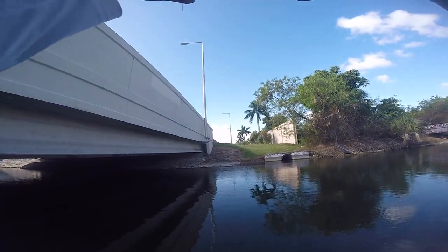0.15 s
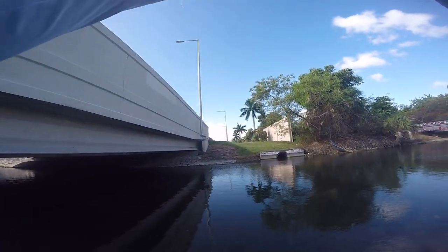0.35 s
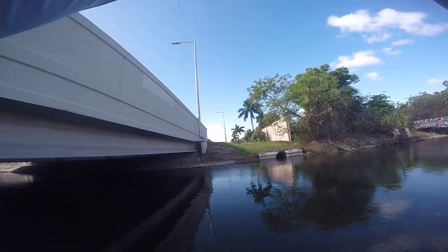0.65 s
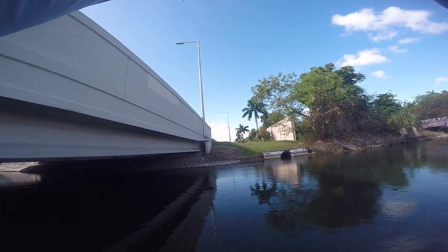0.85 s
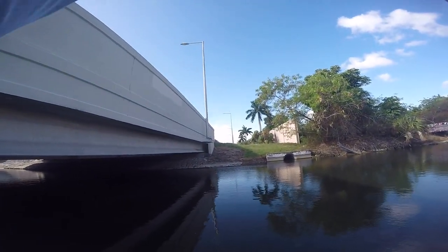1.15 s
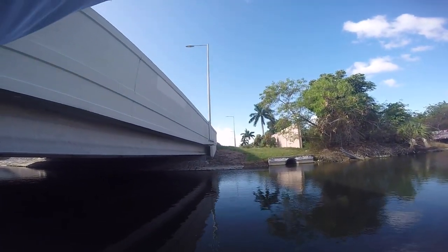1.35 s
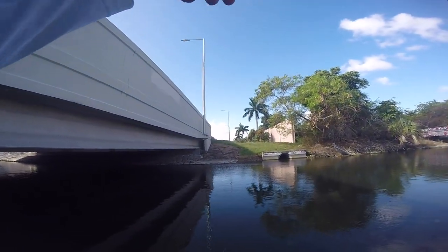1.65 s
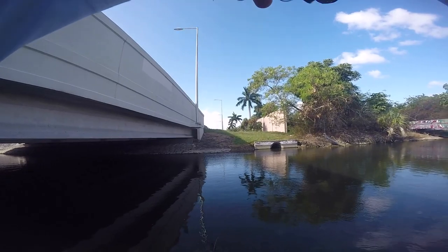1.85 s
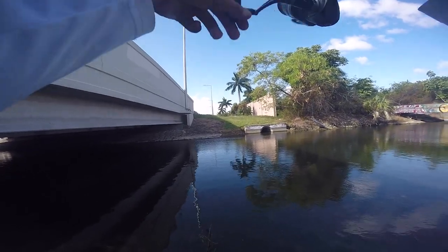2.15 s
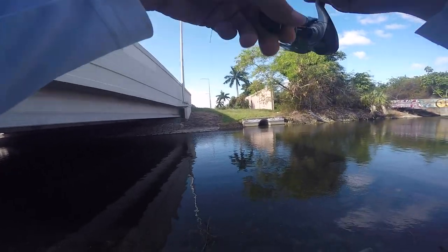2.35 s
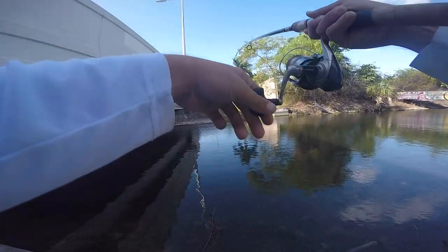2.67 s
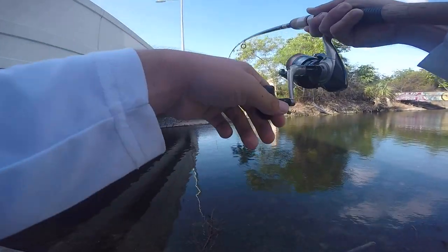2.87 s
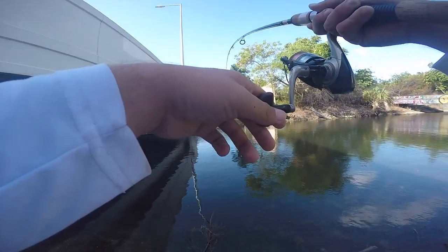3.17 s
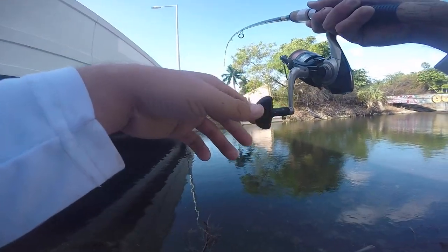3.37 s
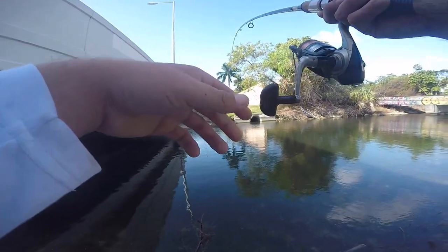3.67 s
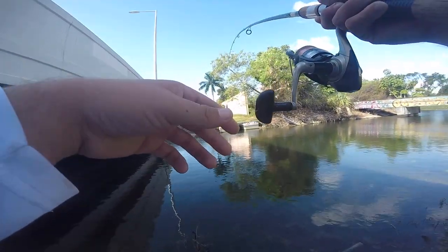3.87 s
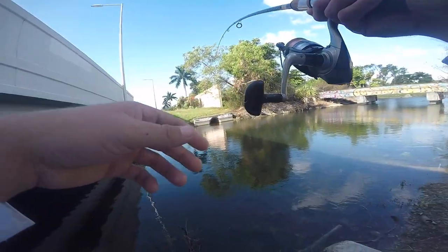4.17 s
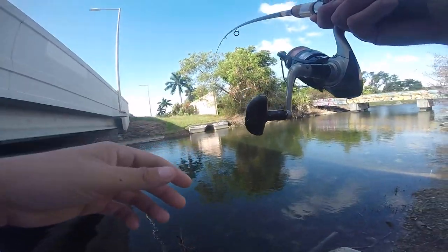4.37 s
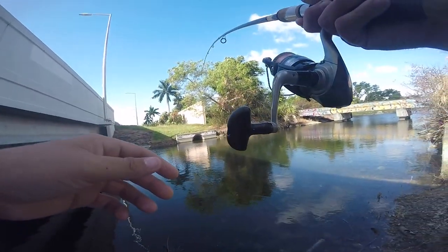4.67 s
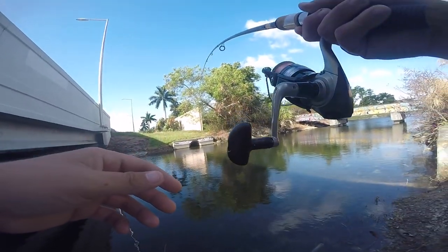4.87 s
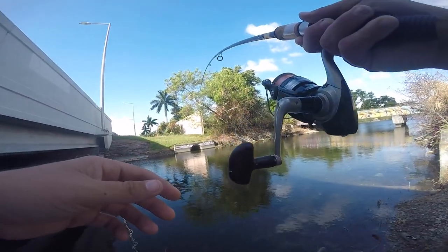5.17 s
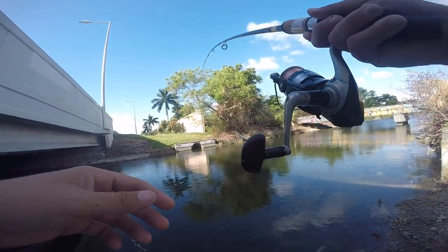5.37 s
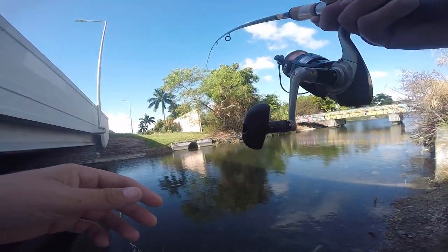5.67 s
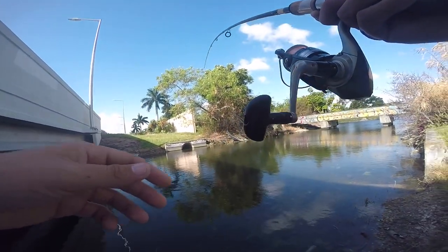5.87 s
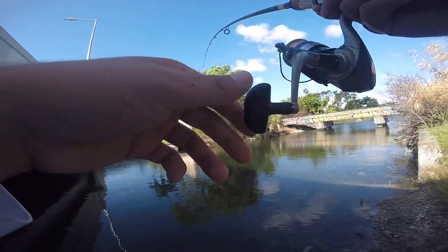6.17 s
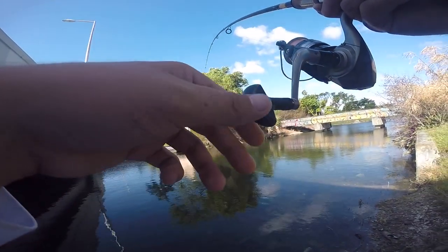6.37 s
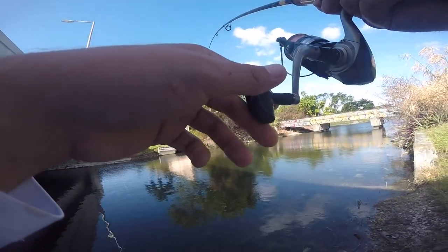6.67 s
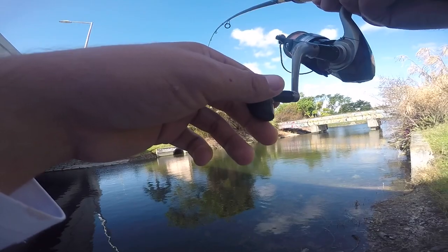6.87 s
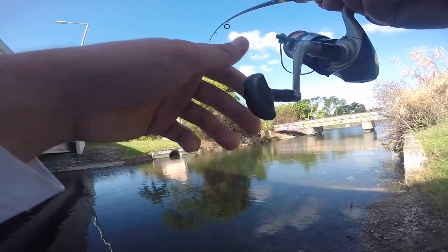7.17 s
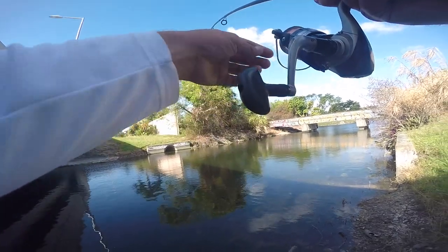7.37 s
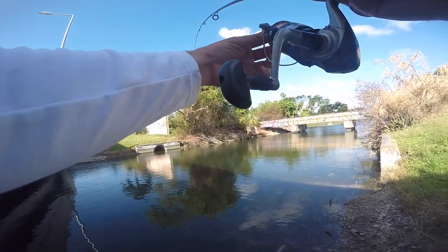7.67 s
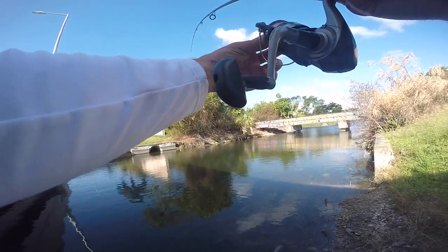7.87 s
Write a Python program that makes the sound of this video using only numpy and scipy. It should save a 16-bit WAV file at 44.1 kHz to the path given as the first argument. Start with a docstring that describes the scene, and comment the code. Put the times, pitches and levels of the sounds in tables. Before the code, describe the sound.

Steady traffic roar from a bridge, with early wind buffets on the microphone and a few sharp fishing reel clicks.

```python
"""Traffic roars on a road bridge, heard by a small camera on the chest of an angler on the canal bank. Many
tyres and engines sum to broadband noise, with lingering bands of high hiss; the deck booms at two low
resonances, under engine notes and a tyre drone. Wind buffets and pops on the microphone port, then eases to a
low rumble with slight swells. Close by, the reel clicks, cloth and line tick, and soft swishes come and go."""
import sys
import numpy as np
from scipy import signal
from scipy.fft import rfft, irfft, next_fast_len
from scipy.io import wavfile
from scipy.ndimage import uniform_filter1d

SR = 44100
rng = np.random.default_rng(int(sys.argv[2]) if len(sys.argv) > 2 else 0)


def waveform_to_disk(signal):
    """Save audio, clipped to [-1, 1], as 16-bit WAV at the path in sys.argv[1]."""
    frames = np.transpose(np.atleast_2d(signal))
    scaled = np.clip(frames, -1, 1) * 32767
    samples = np.round(scaled).astype(np.int16)
    wavfile.write(sys.argv[1], SR, samples)


N = 354123
T = np.arange(N) / SR

# Sleeves and fingers moving on the rod. Each row: start in seconds, length in seconds, peak level in dB.
HAND_MOVES = [(1.5, 1.27, -56), (3.9, 1.7, -59), (7.4, .8, -73)]
# Bands in which cloth and line tick. Each row: centre in Hz, width in Hz, relative level in dB.
CLOTH_BANDS = [(1920, 1200, 0), (3000, 2700, 2), (4460, 1500, 0.5), (6700, 1100, -5), (13500, 3000, -18)]
# Soft swishes and, in the long rows at 6650-8200 Hz, lingering bands of high hiss in the roar.
# Each row: start in seconds, length in seconds, centre in Hz, width in Hz, peak level in dB.
SWISHES_AND_HISS = [(2.2, 0.16, 483, 120, -28.5), (2.3, 0.56, 1620, 320, -55),
                    (3.405, 0.36, 2260, 380, -49.5), (3.42, .2, 2700, 300, -53),
                    (3.53, .15, 2120, 250, -54), (3.55, 0.42, 2500, 950, -53), (5.5, 0.27, 4200, 2490, -54),
                    (4.5, 2.2, 10200, 550, -78), (7.5, 1.3, 2700, 220, -55.5), (4, 0.95, 367, 230, -34),
                    (-0.1, 1.7, 1700, 790, -59), (7, 1.7, 1310, 310, -52), (0.7, 3.4, 8200, 700, -70),
                    (3.8, 1.3, 6700, 700, -70), (4, 1.2, 6650, 660, -73), (4.5, 2.3, 6700, 900, -72),
                    (3.9, 2.3, 8100, 900, -74), (6.5, 2.3, 2860, 1000, -61)]
# Modes of the reel's parts. Each row: frequency in Hz, relative level in dB, seconds to decay by 60 dB
# before the hand's damping.
REEL_MODES = [(1640, 15.5, 0.025), (2050, 13, 0.02), (2840, 12.5, 0.011), (3580, 9, 0.0051),
              (4710, 11.5, 0.0076), (5230, 4, 0.0099), (5860, 6, 0.0046), (6300, 12.5, 0.0044),
              (6900, 11, 0.006), (7600, 6, .004), (8300, 6, 0.0048), (8900, 5, 0.0041), (9800, 8, 0.004),
              (11100, -2, 0.0044), (12000, 4, 0.0041), (13200, 6, 0.0054), (14300, 8, .004)]
# Reel clicks, with a crowd of small ones from 1.6 to 2.8 s. Each row: time in seconds, strength in dB, most
# favoured pitch in Hz, reach around it in octaves.
REEL_CLICKS = [(.8592, -27, 5640, 0.33), (.8593, -43, 12500, .45), (.8615, -58, 13200, .2),
               (.8634, -46, 4900, .25), (.8657, -51, 4900, .25), (1.6557, -52, 3500, .8),
               (1.847, -49, 1900, 0.78), (1.7782, -46, 2600, .6), (1.94, -49, 2200, .8),
               (1.9927, -51, 1900, .6), (2.0157, -50, 3800, .8), (2.04, -51, 4700, .5),
               (2.0623, -50, 2600, .9), (2.084, -50, 2610, 1.0), (2.126, -55, 5200, 1.1),
               (2.1695, -45, 4000, .7), (2.2114, -50, 2600, .8), (2.1908, -51, 2600, 0.97),
               (2.2581, -49, 1700, .6), (2.311, -49, 2800, .9), (2.318, -56, 6600, .8),
               (2.338, -54, 4500, .8), (2.4138, -53, 2400, .8), (2.4537, -50, 2600, .8),
               (2.3621, -54, 3000, .8), (2.3875, -55, 4400, 1.1), (2.475, -62, 14000, .5),
               (2.5192, -54, 3200, .8), (2.5826, -51, 2700, .5), (2.589, -60, 12000, 2.5),
               (2.602, -45, 3100, 0.54), (2.622, -54, 6000, .9), (2.6296, -60, 13000, 1.5),
               (2.6674, -50, 3000, .8), (2.674, -59, 13000, 1.46), (2.785, -51, 3400, 0.94),
               (3.0885, -46, 13000, 2.5), (3.0896, -37, 7700, 0.21), (3.0896, -41, 3480, 0.47),
               (3.0908, -50, 11500, .45), (3.0912, -42.5, 2000, 1.6), (3.095, -54, 4010, 1.0),
               (3.0952, -50, 6900, .2), (3.0978, -49, 3700, .6), (3.1055, -65, 11000, .8),
               (7.1615, -54, 6300, .25), (8.0263, -23.5, 4400, 0.43), (8.0263, -31, 13500, 0.33),
               (8.027, -39, 2860, .3), (8.0275, -38, 6900, .3)]
# Eddies breaking on the port. Each row: time in seconds, peak level in dB, pitch in Hz.
EDDY_POPS = [(0.056, -9.5, 111), (.692, -10.5, 260), (.738, -6, 170), (.888, -9, 330), (0.919, -17, 120),
             (.953, -4, 95), (0.948, -8, 300), (2.148, -17, 90)]
# Spectrum of the wind. Each row: frequency in Hz, relative spectral density in dB.
WIND_SPECTRUM = [(8.8, -28), (15, -1), (38, 2.5), (59, -1.5), (162, -13.5), (416, -19.5), (520, -22.5),
                 (684, -47), (900, -74), (1170, -60), (1980, -120)]
# The underlying breeze. Each row: time in seconds, level in dB.
BREEZE_LEVEL = [(0, -13), (.3, -18.5), (.8, -13), (1.2, -22), (1.35, -27.5), (2.1, -25.5), (2.8, -41),
                (3.7, -30), (4.5, -27), (5.6, -34.5), (6.5, -35.5), (8.03, -34)]
# Early buffets and, from 3.13 s on, slight swells in the low rumble.
# Each row: time of the peak in seconds, peak level in dB, tilt in dB per two octaves.
RUMBLE_PEAKS = [(.04, -9.5, -3.5), (.21, -14.5, -4), (0.382, -8.5, -2.5), (.55, -7, -5.5), (.7, -7, -2),
                (.79, -9.5, -4.5), (.95, -9, 0.5), (1.07, -11.5, -6.5), (1.24, -11.5, -2.5),
                (1.51, -18.5, 0.5), (2.22, -12, -7.5), (2.33, -15.5, -6), (2.51, -24, 1.5), (3.13, -30, -4),
                (3.75, -22.5, 0), (5.049, -24, -12), (5.89, -23, -1), (6.75, -36, 9), (7.78, -24.5, 4)]
# Tyre drone from the deck. Each row: time in seconds, level in dB.
DRONE_LEVEL = [(0, -51), (1.3, -42.5), (1.7, -34), (2.4, -39.5), (3.1, -35.5), (3.6, -46), (6, -53),
               (7, -47), (8.03, -46)]
# Resonances of the deck. Each row: centre in Hz, width in Hz.
DECK_MODES = [(105, 5.5), (115, 8.7)]
# Boom of the deck. Each row: time in seconds, level of the lower mode in dB, of the upper mode in dB.
DECK_LEVELS = [(0, -36, -35), (1.5, -38, -33), (3, -38, -35), (3.7, -32.5, -34), (5.5, -34.5, -37.5),
               (6.6, -33, -36), (8.03, -35, -40)]
# A rising whine and engine notes, one table each. Each row: time in seconds, frequency in Hz, level in dB.
ENGINE_NOTES = [
    [(1.25, 462, -75), (1.4, 475, -41), (1.62, 485, -34.5), (1.8, 530, -46), (1.95, 568, -38),
     (2.05, 575, -78)],
    [(3.3, 103, -65), (3.6, 104, -42), (5, 103, -46), (5.6, 107, -40), (7, 107, -46.5), (8.03, 107, -39)],
    [(5.5, 63, -66), (5.8, 64, -38), (6.1, 65, -36), (6.4, 62, -65)],
    [(6.9, 132, -65), (7.25, 133, -38.5), (8.03, 135, -38)],
    [(1.7, 89.8, -61), (1.95, 88.8, -40.5), (2.4, 87.7, -38), (3.05, 86.2, -34.5), (3.5, 86.7, -60),
     (3.6, 86.7, -80)],
]
# Spectrum of the traffic. Each row: frequency in Hz, relative spectral density in dB.
ROAR_SPECTRUM = [(12, -30), (22, -4), (55, -1), (110, -3.5), (250, -12), (420, -13.5), (600, -16),
                 (720, -21.5), (860, -27.5), (1300, -32.5), (1900, -39), (4400, -46), (9000, -57.5),
                 (11500, -63.5), (15500, -65)]
# The roar as the angler turns. Each row: time in seconds, then overall, treble and low-middle gain in dB.
ROAR_FACING = [(0, 0, 2.5, 2), (1.0, -0.5, 3, 3), (1.9, -0.5, 2.5, 0), (2.6, 1, -0.5, -2), (2.8, 1, -3, -1),
               (3.6, -1, 0, 0), (4.25, -1.5, 2.5, 6), (4.8, -1, 2, 4), (5.4, -0.5, -0.5, 0.5),
               (6.0, -0.5, -1, -3), (6.4, 0.5, -2.5, 0.5), (7.3, 1, -2.5, -0.5), (8.03, -0.5, 0, 3.5)]
# Resonances under the deck and in the microphone port. Each row: centre in Hz, width in Hz, gain in dB.
CAVITY_RESONANCES = [(490, 124, 3.5), (1041, 228, 7), (2670, 720, 4.5), (6500, 1200, 0), (8160, 1250, 2),
                     (3380, 150, 2), (5200, 360, 1.5), (5730, 500, -0.5), (7300, 500, -1)]
# Echo in the housing as the camera turns from the bridge. Each row: time in seconds, amplitude ratio.
HOUSING_ECHO = [(0, 0.13), (2, 0.16), (3, .2), (4.5, .18), (6, 0.23), (6.5, 0.13), (8.03, 0.062)]


def undb(db):
    """Amplitude grows tenfold for every 20 dB."""
    return 10 ** (np.asarray(db) / 20)


def curves(table):
    """Linear interpolation in time gives each later column one value a sample."""
    times, *columns = np.transpose(table)
    return [np.interp(T, times, column) for column in columns]


def wander(rate_hz):
    """Random steps, smoothed twice, form a slow fluctuation with a spread near 1."""
    hold = int(SR / rate_hz)
    steps = np.repeat(rng.standard_normal(N // hold + 1), hold)
    return 1.21 * uniform_filter1d(uniform_filter1d(steps, hold), hold)[:N]


def unit_rms(x):
    """Division by the rms value gives unit power."""
    return x / np.sqrt(np.mean(x ** 2))


def resonate(x, hz, width_hz):
    """A second-order resonator passes one band, with gain 1 at its centre."""
    return signal.lfilter(*signal.iirpeak(hz, hz / width_hz, SR), x)


def narrow_band(x, hz, width_hz):
    """Two resonators of the given width in cascade leave a steeper, narrower band, scaled to rms 1."""
    return unit_rms(resonate(resonate(x, hz, width_hz), hz, width_hz))


def noise_bands(spectrum, lowest_hz, count):
    """Independent noises add in power: yields (Hz, noise) for half-octave bands that share unit power."""
    size = next_fast_len(N)
    hz = np.maximum(np.arange(size // 2 + 1) * SR / size, 1)
    points_hz, points_db = np.transpose(spectrum)
    gain = unit_rms(undb(np.interp(np.log(hz), np.log(points_hz), points_db)))
    position = np.clip(2 * np.log2(hz / lowest_hz), 0, count - 1)
    for k in range(count):
        share = np.cos(np.pi / 2 * np.clip(np.abs(position - k), 0, 1))
        white = rfft(rng.standard_normal(size))
        yield lowest_hz * 2 ** (k / 2), irfft(white * gain * share, size)[:N]


def ticks(per_second):
    """A Poisson process: impulses fall at independent moments, a few much stronger than the rest."""
    occurs = rng.random(N) < per_second / SR
    size_db = 4 * np.minimum(rng.exponential(size=N), 3)
    return unit_rms(occurs * undb(size_db))


def handling():
    """Friction of cloth and line gives tiny ticks over a soft rub; each move swells, then stops."""
    swell = sum(undb(db) * np.sin(np.pi * np.clip((T - start) / length, 0, 1) ** 1.2)
                for start, length, db in HAND_MOVES)
    snaps = ticks(90)  # a snap sounds in every band at once
    out = 0
    for hz, width, db in CLOTH_BANDS:
        rub = 0.72 * snaps + 0.84 * ticks(220) + 0.25 * rng.standard_normal(N)
        out += undb(db) * narrow_band(rub, hz, width)
    return swell * undb(2 * wander(40)) * unit_rms(out)


def swishes_and_hiss():
    """Band-limited noise swells and fades: a swish when brief, a hiss in the roar when long and high."""
    out = 0
    for start, length, hz, width, db in SWISHES_AND_HISS:
        swell = np.sin(np.pi * np.clip((T - start) / length, 0, 1) ** 0.43) ** 2
        out += undb(db) * swell * narrow_band(rng.standard_normal(N), hz, width)
    return out


def reel_clicks():
    """Each reel click is a sum of damped modes, weighted to its pitch, with a brief rattle."""
    hand_damping, loss_at_reach_db, ring_samples = 1.05, 6.5, 1024
    t = np.arange(ring_samples) / SR
    out = np.zeros(N + ring_samples)
    for time, click_db, pitch_hz, reach in REEL_CLICKS:
        start = int(time * SR)
        for k, (hz, mode_db, t60) in enumerate(REEL_MODES):
            decay = np.exp(-np.log(1000) * t * hand_damping / t60)
            rattle = 0.13 * resonate(rng.standard_normal(ring_samples), hz, hz / 6) * np.exp(-t / 0.0039)
            rise = (1 - np.exp(-t * hz / 1.08)) ** 2  # each mode takes a few cycles to get going
            ring = rise * (decay * np.sin(2 * np.pi * hz * t) + rattle)
            loss_db = loss_at_reach_db * (np.log2(hz / pitch_hz) / reach) ** 2
            out[start:start + ring_samples] += (-1) ** k * undb(mode_db + click_db - loss_db) * ring
    return out[:N]


def eddy_pops():
    """An eddy breaking on the port is a pressure pulse: about one cycle under a Gaussian envelope."""
    half_width_cycles = 0.43
    out = 0
    for time, db, hz in EDDY_POPS:
        cycles = hz * (T - time)
        out += undb(db) * np.exp(-(cycles / half_width_cycles) ** 2) * np.cos(2 * np.pi * cycles)
    return out


def wind():
    """Turbulence at the port makes a low rumble; early buffets and later slight swells build, then drop."""
    build_db_per_s, drop_db_per_s = 82, 265
    level_db, = curves(BREEZE_LEVEL)
    tilt_db = np.full(N, 0.5)  # the breeze's tilt holds until a swell is louder
    for peak_time, peak_db, swell_tilt_db in RUMBLE_PEAKS:
        age = T - peak_time
        swell_db = peak_db - np.where(age < 0, -build_db_per_s * age, drop_db_per_s * age)
        tilt_db = np.where(swell_db > level_db, swell_tilt_db, tilt_db)
        level_db = np.maximum(level_db, swell_db)
    tilt_db = uniform_filter1d(tilt_db, size=800)
    out = 0
    for hz, band in noise_bands(WIND_SPECTRUM, lowest_hz=19.63, count=12):
        octaves_up = max(np.log2(hz / 65), 0)
        out += band * undb(octaves_up * tilt_db / 2 + 0.18 * wander(20))
    return undb(level_db) * out


def tyre_drone():
    """Tyre noise on the deck, confined to one narrow band, is heard as a pitched hum."""
    level_db, = curves(DRONE_LEVEL)
    hum = narrow_band(rng.standard_normal(N), hz=496, width_hz=132)
    return undb(level_db + 1.1 * wander(6)) * hum


def deck_boom():
    """Under random forcing by traffic, the deck responds at its two low modes."""
    return sum(undb(db) * narrow_band(rng.standard_normal(N), hz, width)
               for (hz, width), db in zip(DECK_MODES, curves(DECK_LEVELS)))


def engine_notes():
    """The periodic motion of passing engines radiates tones that waver slightly in pitch and level."""
    out = 0
    for note in ENGINE_NOTES:
        hz, db = curves(note)
        wavering_hz = hz * (1 + 0.0033 * wander(10))
        tone = np.sqrt(2) * np.sin(2 * np.pi * np.cumsum(wavering_hz) / SR)
        out += undb(db + 0.65 * wander(6.1)) * tone
    return out


def housing_comb(sound):
    """Interference with an inverted echo inside the housing cuts evenly spaced dips into the treble."""
    delay_s = 0.000538
    echo_ratio, = curves(HOUSING_ECHO)
    treble = signal.lfilter(*signal.butter(1, [1300, 8000], "band", fs=SR), sound)
    return sound - echo_ratio * np.interp(T - delay_s, T, treble)


def traffic_roar():
    """Far tyres and engines add incoherently; cavity resonances and the camera's facing colour the sum."""
    base_db = -26
    overall_db, treble_db, middle_db = curves(ROAR_FACING)
    roar = 0
    for hz, band in noise_bands(ROAR_SPECTRUM, lowest_hz=25.21, count=19):
        treble_share = np.clip(np.log2(hz / 1070) / 0.67, 0, 1)
        middle_share = np.exp(-np.log2(hz / 187) ** 2 / 0.75)
        drift_db = 0.64 * wander(1.56) + 0.5 * wander(9.9)
        roar += band * undb(treble_share * treble_db + middle_share * middle_db + drift_db)
    for hz, width, db in CAVITY_RESONANCES:
        roar += (undb(db) - 1) * resonate(roar, hz, width)
    return undb(base_db + overall_db) * housing_comb(roar)


def scene():
    """Superposition: the pressures of all sources add at the single microphone."""
    bridge = traffic_roar() + deck_boom() + engine_notes() + tyre_drone()
    return (bridge + wind() + eddy_pops() + swishes_and_hiss() + handling() + reel_clicks())[None]


def record(dry):
    """The microphone adds self-noise and saturates softly; the camera cuts the deepest bass and the top."""
    hiss = undb(-73) * resonate(rng.standard_normal(N), hz=13500, width_hz=4000)
    fade_in = np.minimum(T / 0.002, 1)
    pressure = (dry + hiss) * fade_in
    saturated = np.tanh(1.043 * pressure) / 1.153  # strong gusts push the capsule towards its limit
    bass_cut = signal.butter(2, 18, "high", fs=SR, output="sos")
    top_cut = signal.ellip(8, 0.5, 60, 15000, fs=SR, output="sos")
    return signal.sosfilt(top_cut, signal.sosfilt(bass_cut, saturated))


dry = scene()
out = record(dry)
waveform_to_disk(out)
```